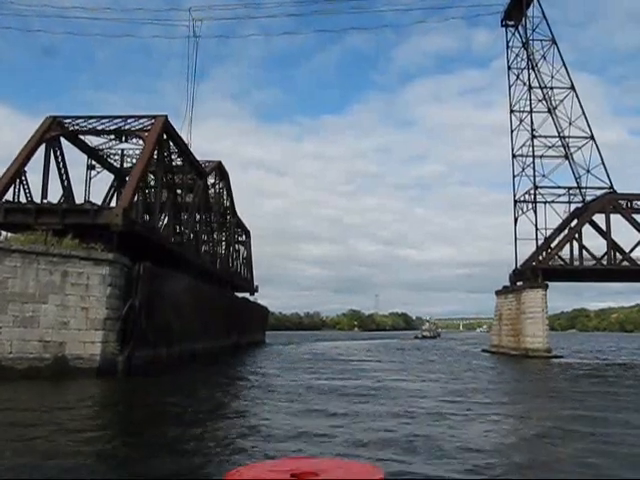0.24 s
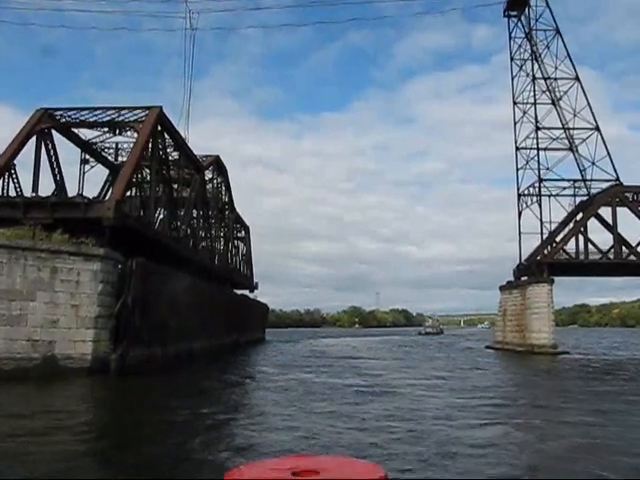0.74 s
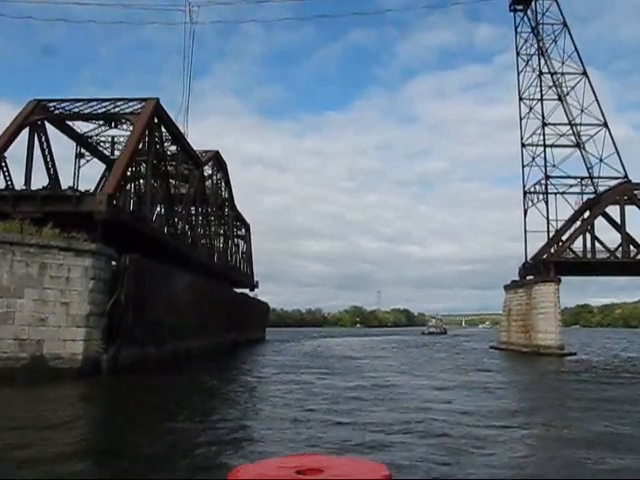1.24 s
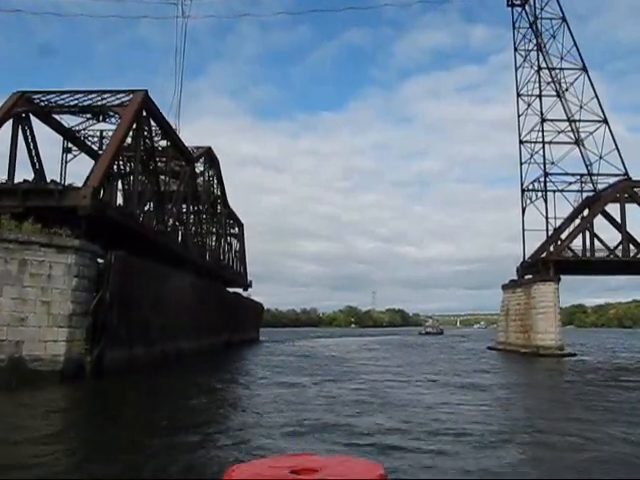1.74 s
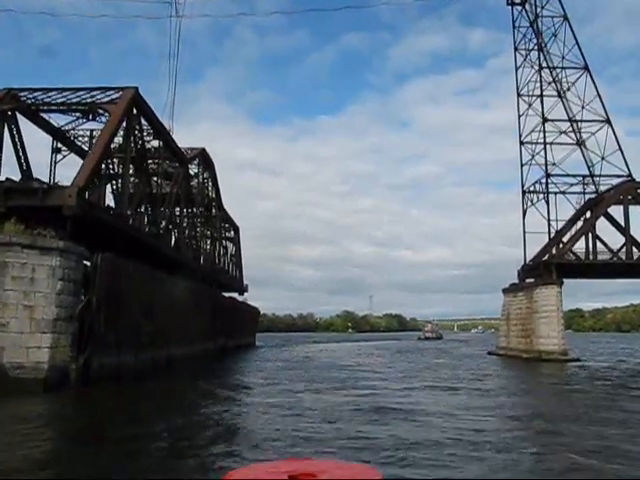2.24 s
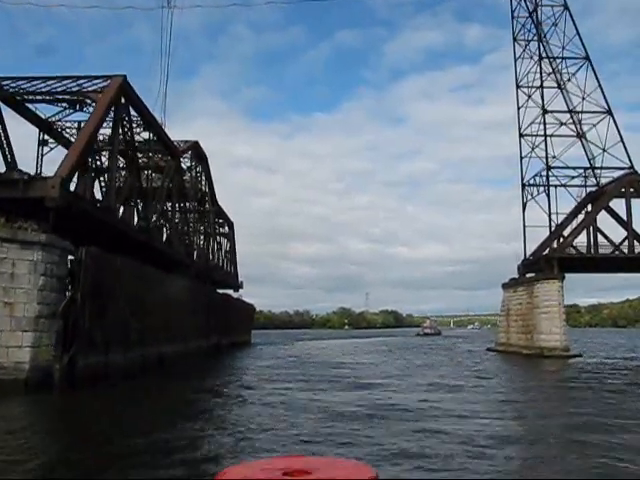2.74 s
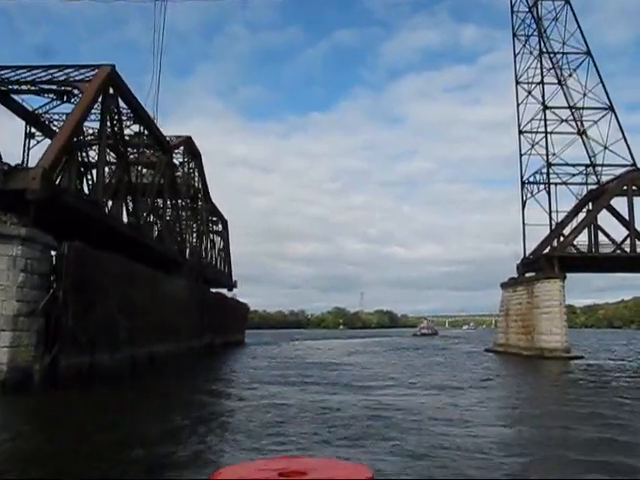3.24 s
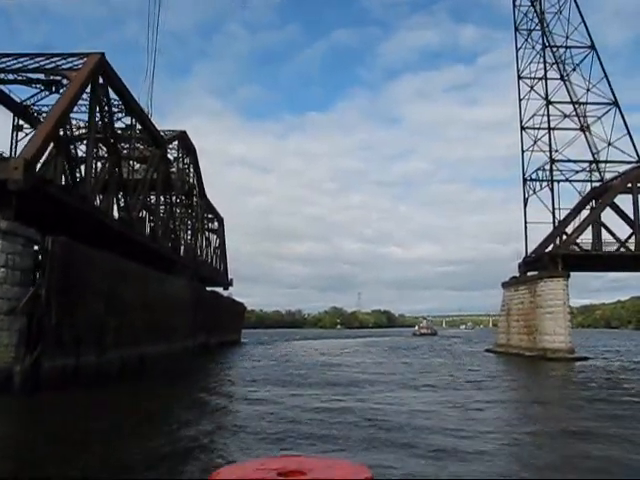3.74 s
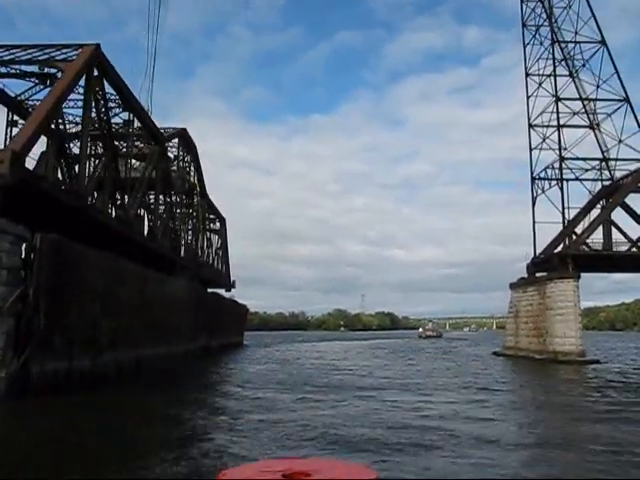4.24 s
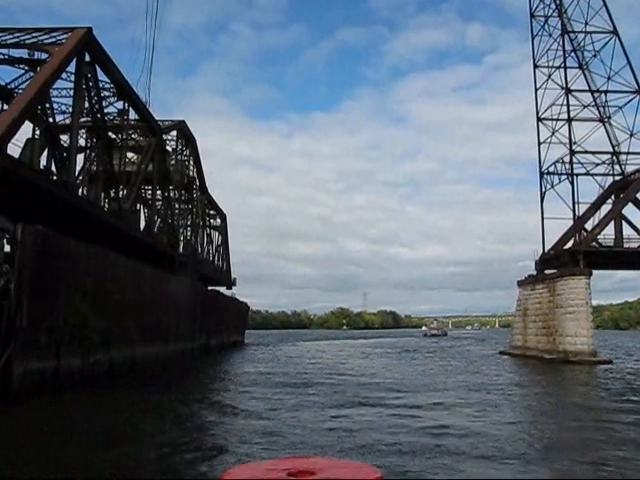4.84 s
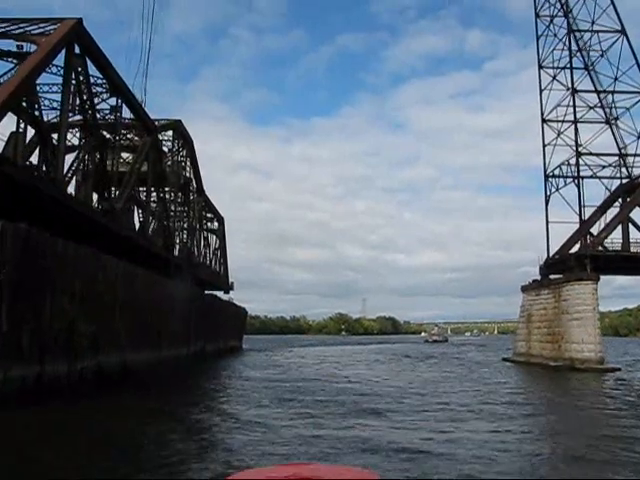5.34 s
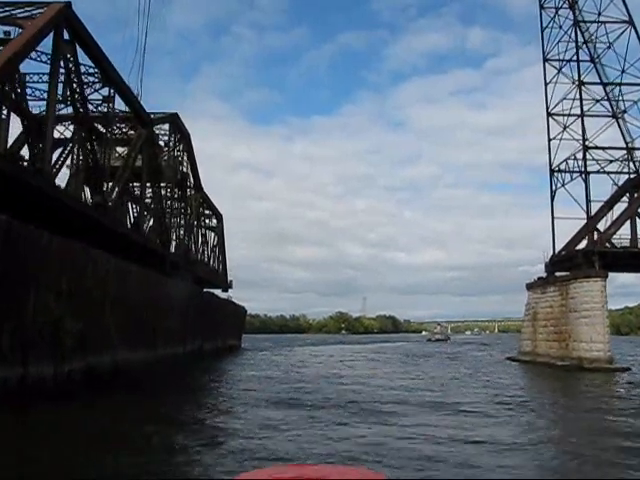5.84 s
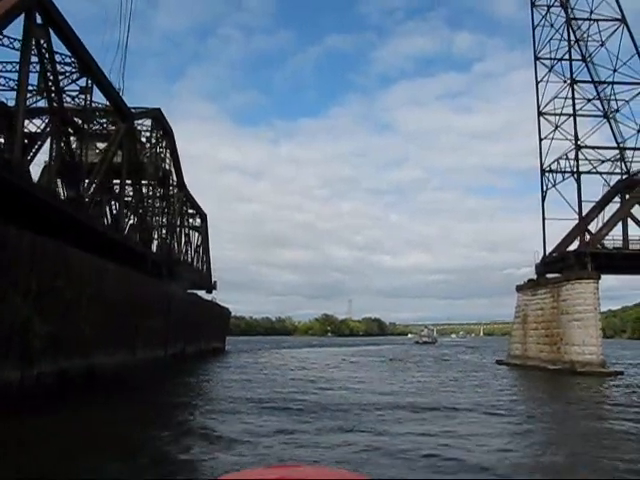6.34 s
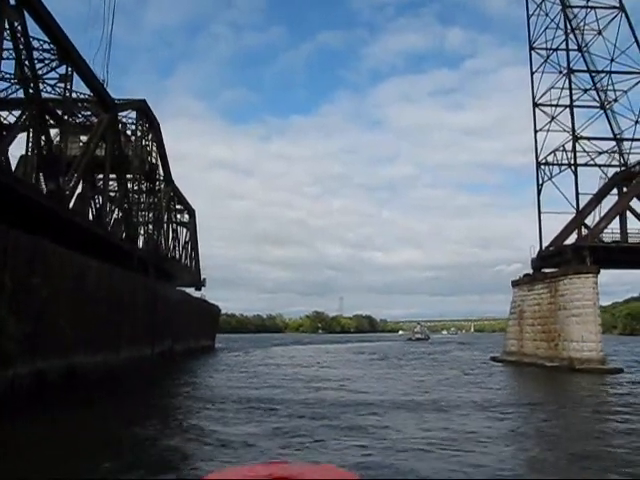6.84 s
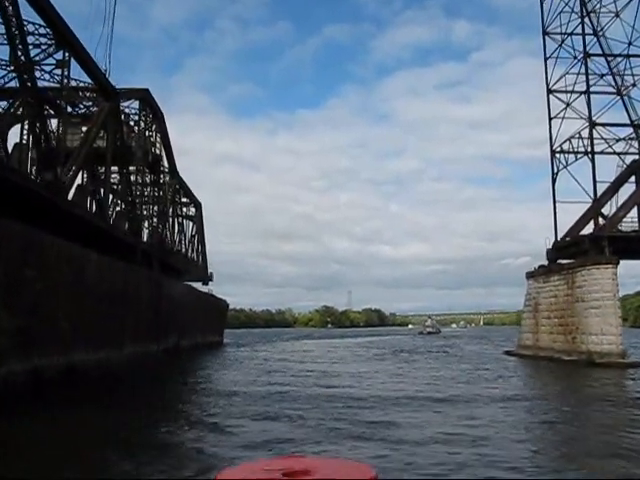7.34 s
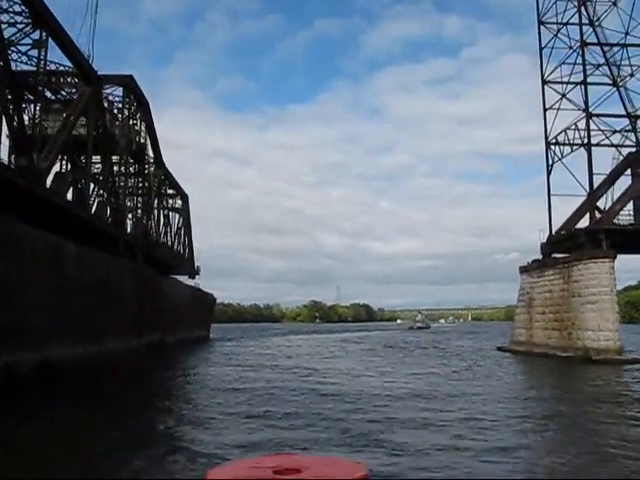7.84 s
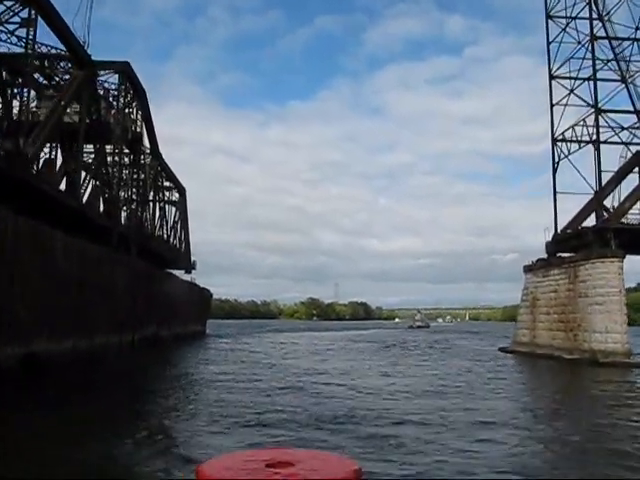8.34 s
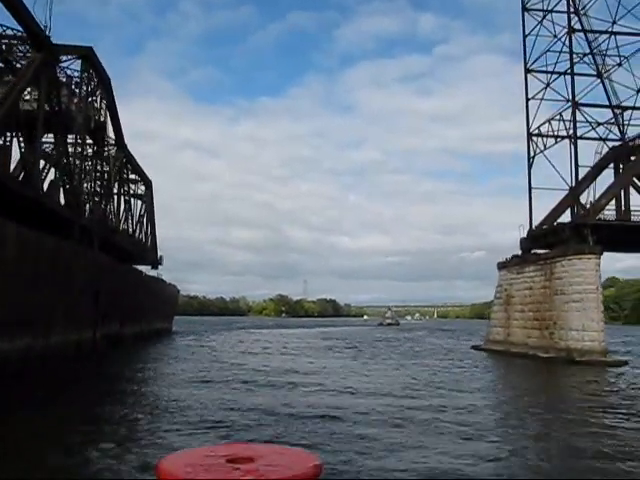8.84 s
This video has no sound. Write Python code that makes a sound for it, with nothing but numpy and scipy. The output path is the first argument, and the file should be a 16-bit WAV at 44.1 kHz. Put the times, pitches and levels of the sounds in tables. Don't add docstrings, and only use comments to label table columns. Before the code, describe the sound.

Wind hits an unprotected small microphone at once, on a boat moving over open river water past a bridge. A bass-heavy, lumpy roar runs throughout, with a deep wavering engine hum and a smooth, faint wash along the hull beneath. From 0 to 1 s come booms and a few slaps; a stronger surge arrives near 1.2 s, and a hard slap at about 2.3 s, followed by a short easing. From 3 s blows return, packing tightly between 4 and 5.4 s with thuds, slaps and sharp dry crackles, then again from 5.6 to 7.3 s. A heavy boom lands near 7.7 s, a strong slap near 8.5 s, and the last gust at 9 s as the wind weakens. After each peak the level ducks abruptly and climbs back. The sound is mono, close, clipped and grainy, with a rough digital edge.

```python
import sys
import numpy as np
from scipy import signal
from scipy.fft import rfft, irfft
from scipy.io import wavfile
from scipy.ndimage import uniform_filter1d

SR = 44100
rng = np.random.default_rng(int(sys.argv[2]) if len(sys.argv) > 2 else 0)


def boost(x):
    u = np.asarray(x, float) / 20
    return 10 ** u


def pcm_store(signal):
    levels = np.round(np.clip(np.atleast_2d(signal), -1, 1) * 32767)
    wavfile.write(sys.argv[1], SR, levels.astype(np.int16).T)


N = 401310


def evened(x):
    return x / np.sqrt(np.mean(x ** 2) + 1e-20)


def add(mix, centre_s, sound):
    start = max(round(centre_s * SR) - len(sound) // 2, 0)
    part = mix[start:][:len(sound)]
    part += sound[:len(part)]


def drift(top_hz):
    hz = np.fft.rfftfreq(N, 1 / SR)
    colour = np.exp(-(hz / top_hz) ** 2) / np.sqrt(hz + top_hz / 4)
    return evened(irfft(rfft(rng.standard_normal(N)) * colour, N))


def noise(points):
    points_hz, points_db = np.transpose(points)
    hz = np.fft.rfftfreq(N, 1 / SR)
    colour = boost(np.interp(np.log(hz + 1), np.log(points_hz), points_db))
    return evened(irfft(rfft(rng.standard_normal(N)) * colour, N))


# time in seconds, wind in dB, engine hum in dB.
BREEZE_ROWS = [(0, 1.5, 0.5), (0.499, -0.5, 2), (1, -0.5, 0.5), (1.249, 4.5, 0), (1.5, -3.5, -2.5),
               (2, 0, 2.5), (2.5, -4, -3.5), (3, -1, 1), (3.501, 2, -0.5), (4.401, -3.5, 0.5),
               (4.998, 3, 4), (5.298, -5.5, 0), (5.701, 3.5, -2), (6.5, -1.5, -1.5), (7, -0.5, -1),
               (7.7, -1.5, -1.5), (8.5, -3.5, 0), (9.1, -5, -4)]


def breeze(column):
    rows = np.array(BREEZE_ROWS)
    return boost(np.interp(np.arange(N) / SR, rows[:, 0], rows[:, column]))


# frequency in Hz, density in dB per Hz.
ROAR_SPECTRUM = [(10, -4), (28, 3.5), (40, -3.5), (80, 1.5), (200, -0.5), (300, -3), (500, -11),
                 (1000, -24), (3000, -54)]


def roar():
    air = noise(ROAR_SPECTRUM)
    low = signal.sosfilt(signal.butter(2, 220, fs=SR, output="sos"), air)
    flutter = evened(boost(2.7 * drift(150)) * (air - low))
    return boost(-21 + 1.2 * drift(40)) * breeze(column=1) * (low + flutter)


# frequency in Hz, level in dB rms.
HUM_LINES = [(44, -37), (53, -33.5), (59, -33), (65.3, -30.5), (68.2, -30.5)]


def engine():
    t = np.arange(N) / SR
    hum = np.zeros(N)
    for hz, db in HUM_LINES:
        strength = boost(db + 2.5 * drift(1.5))
        waver_cycles = np.cumsum(0.4 * drift(1.5)) / SR
        hum += strength * np.sin(2 * np.pi * (hz * t + waver_cycles + rng.random()))
    return np.sqrt(2) * hum * breeze(column=2)


# frequency in Hz, density in dB per Hz.
WASH_SPECTRUM = [(150, -7.5), (500, -1), (900, -7), (1200, -8.5), (1500, -8), (1750, -14), (2500, -19.5),
                 (3500, -25.5), (5500, -30.5)]


def water():
    return boost(-31 + 0.89 * drift(25)) * noise(WASH_SPECTRUM)


def sized(own, usual, stray_count, stray_db, reach_s, pitch_hz, usual_ms):
    listed = own + usual
    luck = np.clip(rng.standard_normal((stray_count, 2)), -2, 2)
    s, db, _ = np.array(listed)[rng.integers(0, len(listed), stray_count)].T
    stray_s = np.clip(s + reach_s * luck[:, 0], 0, N / SR - 0.1)
    strays = np.c_[stray_s, db + stray_db + 2.5 * luck[:, 1], np.full(stray_count, usual_ms)]
    rows = np.r_[listed, strays]
    pitch_scatter, length_scatter = 0.11, 0.2
    scatter = np.exp(rng.uniform(-1, 1, (len(rows), 2)) * [pitch_scatter, length_scatter])
    scatter[:len(own), 1] = 1
    return np.c_[rows[:, :2], pitch_hz * scatter[:, 0], rows[:, 2] * scatter[:, 1]]


def bursts(table, looseness, depth, lump_db, lumps_hz):
    out = np.zeros(N)
    size = 4096
    jolts = rng.standard_normal((len(table), size))
    lumps = boost(lump_db * drift(lumps_hz))
    hz = np.fft.rfftfreq(size, 1 / SR) + 1
    for (s, db, pitch_hz, ms), jolt in zip(table, jolts):
        resonance = 1 / (1 + ((hz / pitch_hz - pitch_hz / hz) / looseness) ** 2)
        push = depth / (1 + (hz / pitch_hz) ** 4)
        ring = signal.hilbert(irfft(rfft(jolt) * (resonance + push)))
        ring = (ring / np.sqrt(abs(ring) + 1e-9)).real
        length = min(int(ms * SR / 1000) + 8, size)
        shape = np.sin(np.pi * np.linspace(0, 1, length) ** 1.4) ** 2
        lump = lumps[int(s * SR):][:length]
        add(out, s - ms / 9000, boost(db) * evened(ring[:length] * shape * lump))
    return out


# time in seconds, level in dB rms, length in ms, pitch in Hz.
LONE_CRACKLES = [(0.0113, -33, 5.3, 3030), (0.1568, -31, 3.5, 3100), (1.243, -30, 2, 3080),
                 (1.265, -31.5, 7.2, 2380), (1.5809, -32, 18, 2560), (1.7372, -27, 4.3, 3040),
                 (1.8113, -30.5, 16.6, 2430), (2.0533, -31, 7.2, 3000), (2.8938, -32, 8.8, 2400),
                 (3.063, -35, 5.3, 2650), (3.1349, -32, 4.3, 2830), (3.2097, -33, 4.4, 2250),
                 (3.623, -38, 16, 2130), (4.2264, -24, 7.7, 2200), (4.4688, -37.5, 23, 2850),
                 (4.6627, -37, 3.2, 2420), (4.7084, -33.5, 7, 3600), (5.098, -35, 3.7, 3000),
                 (5.9187, -38.5, 30, 3180), (6.0448, -30.5, 9.7, 2500), (6.1096, -37.5, 32, 3030),
                 (6.1532, -24, 2.9, 2760), (6.281, -34, 4.5, 3650), (6.6198, -26.5, 5.6, 3010),
                 (6.671, -34, 15, 3440), (6.7508, -33, 15, 3400), (6.7902, -29.5, 2.4, 2500),
                 (6.965, -25, 2.2, 4280), (7.1757, -31.5, 9.9, 3500), (7.867, -32.5, 3.7, 4900)]
# time in seconds, boom in dB, slap in dB, crackle in dB.
GUST_STRIKES = [(0.2204, -19.5, -18, -57), (1.2035, -23, -16, -34.5), (1.659, -14, -21.5, -46),
                (2.0374, -18, -19.5, -33), (2.3118, -21.5, -8.5, -37), (3.1242, -18.5, -13.5, -50),
                (3.2646, -23, -13.5, -46.5), (3.8754, -21.5, -16, -34.5), (4.156, -18.5, -16, -33),
                (4.2233, -20.5, -21.5, -49), (4.2688, -19, -13, -33), (4.4858, -16.5, -22, -32),
                (4.5769, -15.5, -15, -24.5), (4.7714, -20, -20.5, -29.5), (4.9413, -15, -18.5, -32.5),
                (4.9963, -25.5, -22, -33), (5.053, -15.5, -23, -35.5), (5.365, -16.5, -13.5, -29.5),
                (5.8916, -16, -13, -37.5), (6.252, -18.5, -17, -29), (6.3374, -21.5, -18.5, -49),
                (6.5059, -18, -24.5, -32.5), (6.589, -19.5, -18.5, -31), (6.611, -14.5, -15.5, -33),
                (6.66, -27, -19, -28), (7.0812, -32, -12.5, -32), (7.1532, -14, -18.5, -33),
                (8.146, -23.5, -19, -50), (8.5474, -20.5, -10, -27), (9.019, -17.5, -22.5, -44)]


def crackles():
    pitch_hz, usual_ms = 3100, 6.3
    in_gusts = [(s, crackle_db, usual_ms) for s, _, _, crackle_db in GUST_STRIKES]
    fine = sized([], in_gusts, 45, -8, 0.019, pitch_hz, usual_ms)
    fine = np.r_[fine, [(s, db, hz, ms) for s, db, ms, hz in LONE_CRACKLES]]
    return boost(-1.5) * bursts(fine, looseness=0.55, depth=0.7, lump_db=6, lumps_hz=500)


# time in seconds, level in dB rms, length in ms, boom beneath in dB.
MIDDLE_EDDIES = [(0.015, -21.5, 22.6, -22), (0.0608, -18, 7.0, -22), (1.2555, -19.5, 24.5, -21),
                 (1.5784, -18.5, 10, -42), (1.8509, -17.5, 17, -17.5), (2.0704, -20, 7.2, -20.5),
                 (3.2194, -20.5, 10, -20.5), (3.3328, -24, 14, -21.5), (3.4587, -18, 8.4, -27),
                 (3.4877, -20, 10.3, -18.5), (3.7081, -17, 4.8, -30.5), (3.852, -26.5, 32, -28.5),
                 (4.0396, -21, 15, -20), (4.5228, -19.5, 6.1, -26), (4.8077, -17, 7.3, -28.5),
                 (4.838, -19, 12, -17), (4.8785, -18, 12.7, -17), (5.5888, -17, 19.6, -22.5),
                 (5.8006, -21.5, 16, -20), (5.921, -29, 40, -20), (6.1103, -19.5, 28, -23.5),
                 (6.3266, -25, 3.4, -27), (6.4755, -26, 31, -21.5), (6.6735, -25.5, 14.3, -23),
                 (6.9489, -21, 12, -18.5), (6.9665, -20.5, 15.3, -20), (7.034, -24.5, 16.4, -18.5),
                 (7.3421, -31, 20, -19.5), (7.867, -16, 12.5, -35), (8.7562, -23.5, 14, -20)]


def slaps():
    pitch_hz, usual_ms, usual_db = 664, 7.3, -17.5
    shrink = 0.45
    in_gusts = [(s, db, usual_ms * boost(shrink * (usual_db - db))) for s, _, db, _ in GUST_STRIKES]
    alone = [row[:3] for row in MIDDLE_EDDIES]
    middle = sized(alone, in_gusts, 12, -10, 0.028, pitch_hz, usual_ms)
    return boost(-2.5) * bursts(middle, looseness=0.46, depth=0.71, lump_db=2.1, lumps_hz=180)


# time in seconds, level in dB rms, length in ms.
LARGE_EDDIES = [(0.164, -16.5, 35), (0.485, -24, 26), (0.573, -17.5, 20), (0.628, -21.5, 53),
                (0.684, -17.5, 26), (0.997, -24, 73), (1.122, -19, 23.5), (1.297, -21.5, 24),
                (1.448, -34, 22.6), (1.813, -15.5, 37), (1.999, -17, 37.5), (2.94, -16.5, 57),
                (3.164, -22, 55), (3.431, -16.5, 22), (3.573, -23.5, 31), (3.678, -16.5, 59),
                (4.076, -16, 21.7), (4.553, -15.5, 19), (4.684, -18.5, 45), (5.515, -21, 53),
                (5.658, -15, 25), (5.701, -17.5, 31), (5.772, -19, 30), (6.055, -17, 53),
                (6.138, -17, 22.5), (6.765, -19, 93), (7.125, -22, 21.5), (7.715, -13.5, 43),
                (8.444, -19.5, 60), (8.889, -18, 37)]


def booms():
    pitch_hz, usual_ms = 189, 42
    beneath = [(s, boom_db, usual_ms) for s, _, _, boom_db in MIDDLE_EDDIES]
    in_gusts = [(s, boom_db, usual_ms) for s, boom_db, _, _ in GUST_STRIKES]
    large = sized(LARGE_EDDIES, beneath + in_gusts, 24, -9, 0.06, pitch_hz, usual_ms)
    return boost(-1) * bursts(large, looseness=1.3, depth=0.5, lump_db=1.4, lumps_hz=60)


def eddies():
    return (crackles() + slaps() + booms()) / camera_gain()


# time in seconds, gain just after in dB, climb in dB per second.
GAIN_DUCKS = [(0.068, -2.5, 29), (0.24, 1, 15), (0.989, -4.5, 25), (1.294, -3.5, 59.5), (1.591, 3.5, 22),
              (1.863, -1.5, 24), (2.06, -2.5, 23), (2.321, 0, 18), (2.928, 2.7, 26.5), (3.143, -4, 27),
              (3.273, -5, 30), (3.681, -1.5, 25), (3.891, -1, 28), (4.057, -0.5, 22), (4.284, -4, 25),
              (4.511, -3.5, 25.5), (4.885, -5, 33), (5.378, 1, 22.5), (5.61, -3, 24), (5.818, -6, 23.5),
              (6.081, -1, 23.5), (6.351, -3.5, 17.5), (6.638, -2, 26), (6.973, -0.5, 23.5),
              (7.192, -2.5, 14.5), (7.348, -5, 53), (7.689, 6, 27), (8.159, -1, 22), (8.557, -1, 29),
              (9.026, -3, 16)]


def camera_gain():
    s, after_db, climb_db_per_s = np.transpose([(0.014, -1.3, 12.5)] + GAIN_DUCKS)
    t = np.arange(N) / SR
    last = np.clip(np.searchsorted(s, t, "right") - 1, 0, None)
    climb_db = after_db[last] + climb_db_per_s[last] * (t - s[last])
    knee_db, slowing = 2.5, 0.32
    climb_db = np.minimum(climb_db, knee_db + slowing * (climb_db - knee_db))

    share, from_db, lag_s, recovery_s = 0.25, -23.5, 0.018, 0.15
    peaks = [row[:2] for row in LARGE_EDDIES + MIDDLE_EDDIES]
    peaks += [(row[0], max(row[1:])) for row in GUST_STRIKES]
    nudges = np.zeros(N + SR)
    for at_s, db in peaks:
        nudges[int((at_s + lag_s) * SR)] += share * max(db - from_db, 0)
    nudge_db = signal.lfilter([1], [1, -np.exp(-1 / (recovery_s * SR))], nudges)[:N]
    return boost(uniform_filter1d(climb_db - nudge_db, size=200))


def scene():
    return (roar() + engine() + water() + eddies())[None]


def band_limit(x):
    return signal.sosfilt(signal.butter(12, 15760, fs=SR, output="sos"), x)


def record(dry):
    x = 0.73 * np.tanh(dry * camera_gain() / 0.83)
    x = signal.oaconvolve(x, signal.firwin(31, 6200, fs=SR)[None], "same", axes=1)
    converter_hz, levels = 11026, 128
    ticks = np.floor(np.arange(N) * converter_hz / SR)
    held = x[:, np.ceil(ticks * SR / converter_hz).astype(int)]
    steps = np.round(held * levels + 0.44) / levels
    output_filter = signal.firwin(511, 15700, window=("kaiser", 9), fs=SR)
    mix = signal.oaconvolve(steps, output_filter[None], "same", axes=1)
    return band_limit(mix)


dry = scene()
out = record(dry)
pcm_store(out)
```